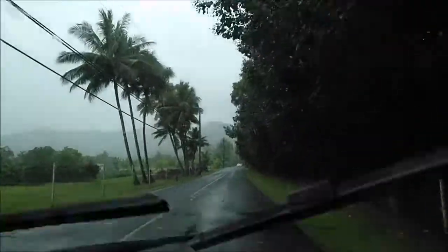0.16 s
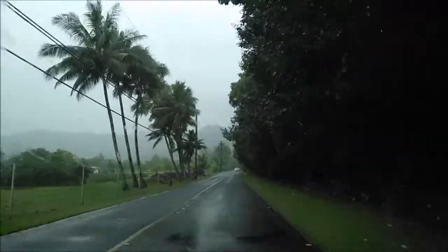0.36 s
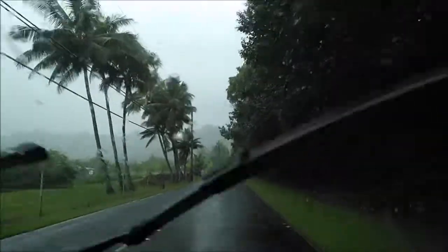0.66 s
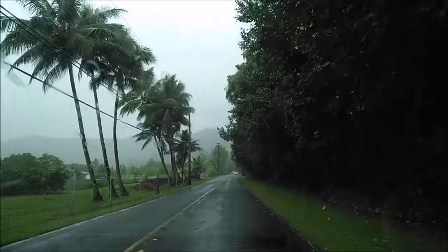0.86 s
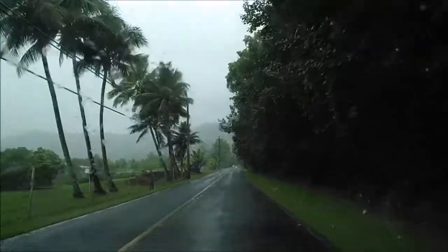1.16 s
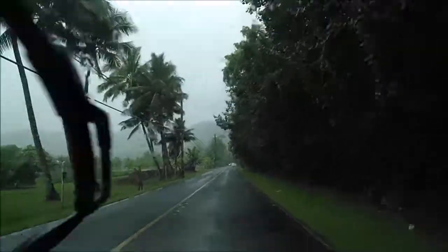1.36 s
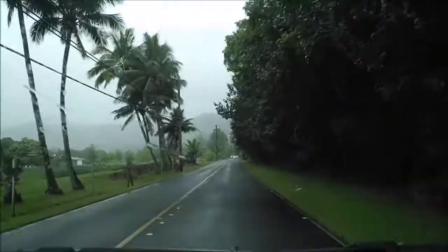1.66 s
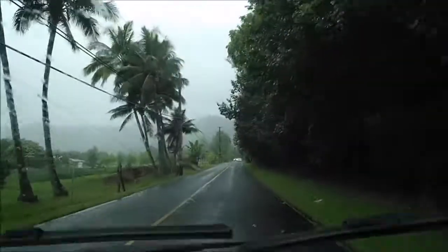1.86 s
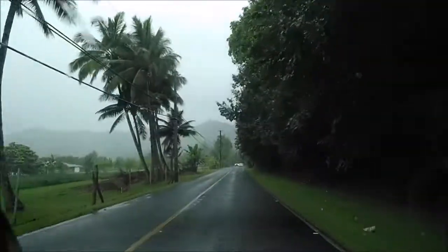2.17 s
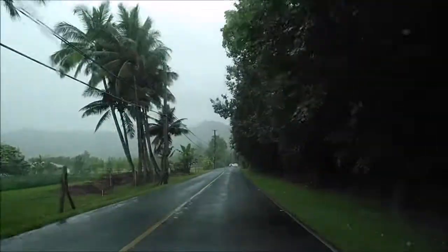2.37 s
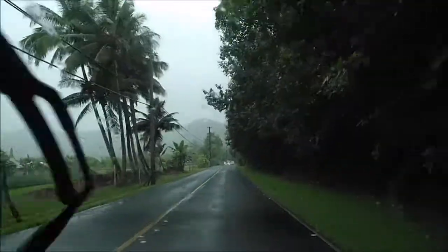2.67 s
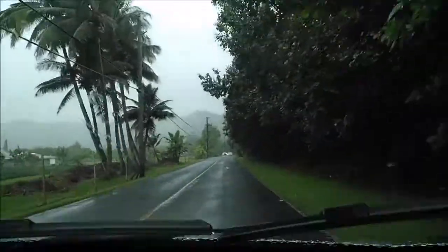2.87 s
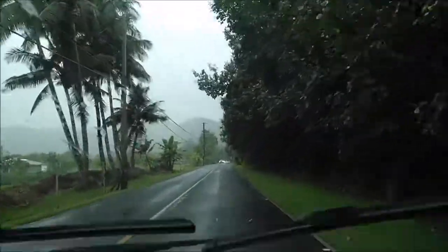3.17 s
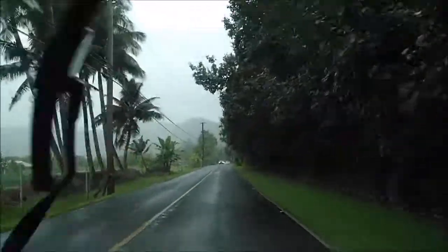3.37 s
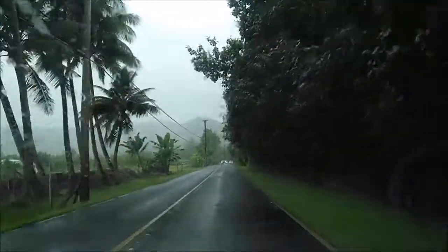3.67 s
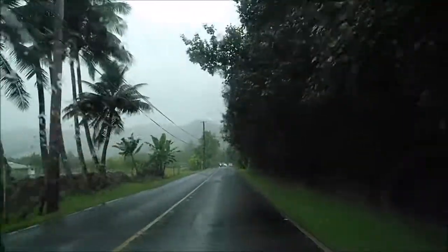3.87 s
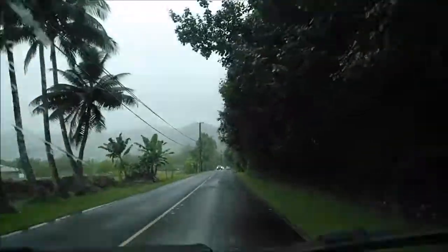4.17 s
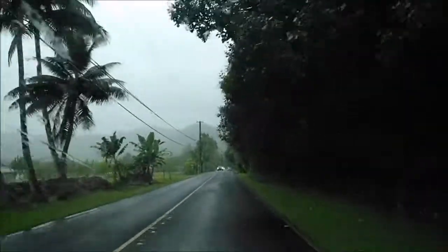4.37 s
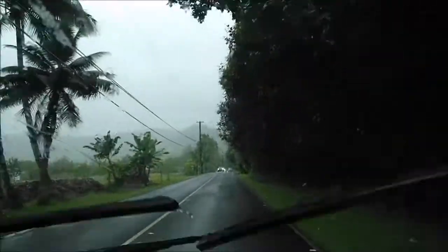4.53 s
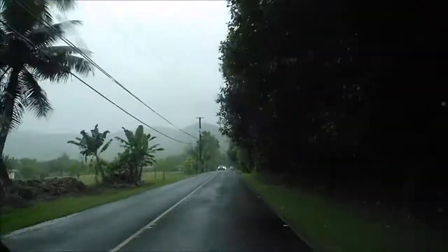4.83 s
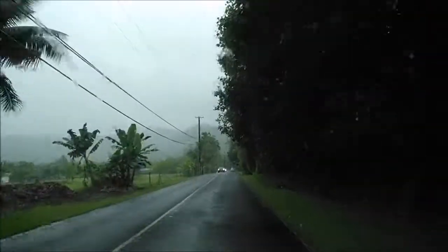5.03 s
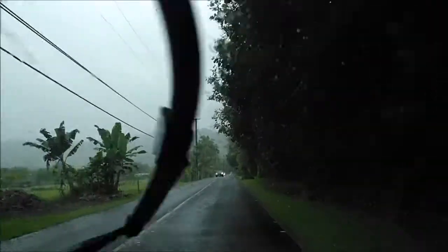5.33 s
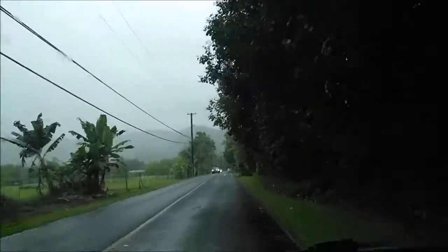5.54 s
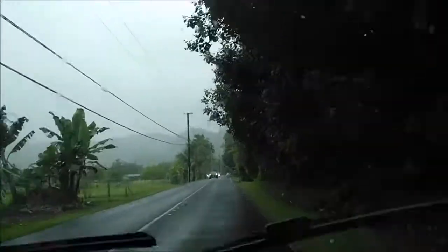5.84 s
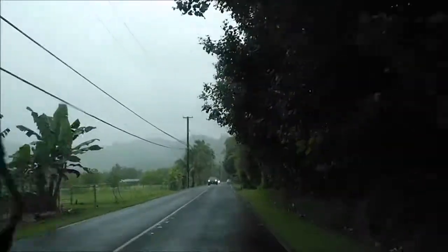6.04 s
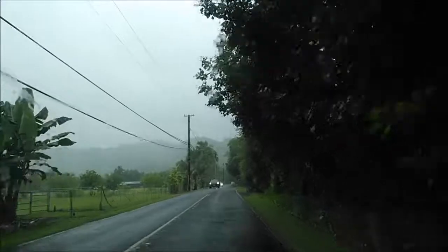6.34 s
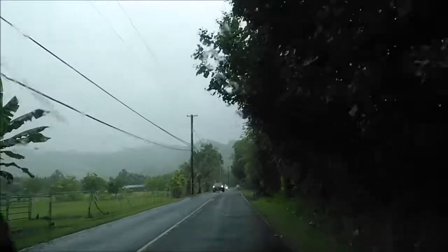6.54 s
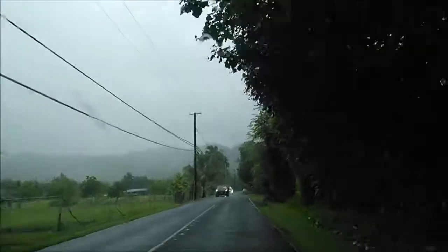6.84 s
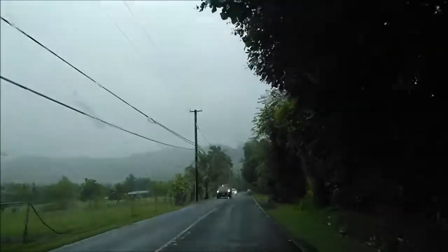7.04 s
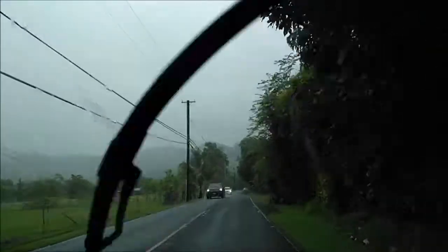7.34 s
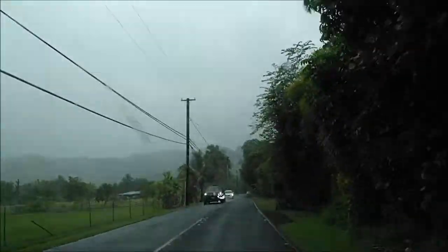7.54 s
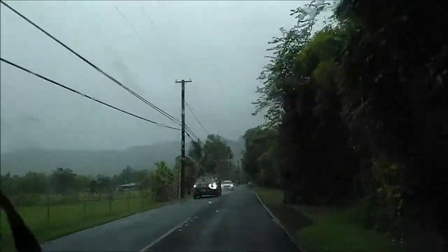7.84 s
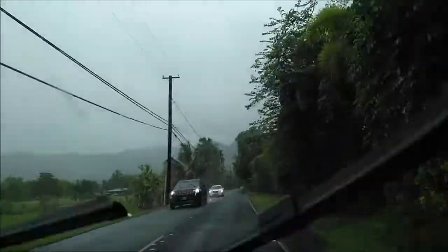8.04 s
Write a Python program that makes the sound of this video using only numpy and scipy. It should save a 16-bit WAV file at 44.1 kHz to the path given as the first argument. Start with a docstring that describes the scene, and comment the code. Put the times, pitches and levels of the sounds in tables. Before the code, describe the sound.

Inside a moving car on a wet road: low rumble, soft rain hiss, dull wiper thuds, and clustered hard drops smacking the windshield.

```python
"""Wet country road, car interior

Shaped noise gives body boom, cabin rumble, tread, tyre swish, rain hiss and low swells, mostly puddles.
Short low tones mark road bumps; wipers thud and slap at each turn; light drops tap the roof.
Drops from overhanging trees, faint to heavy, hit windshield and roof in bursts: noise blows with a brief ring,
flexing panel modes, falling droplets, one bubble tone and a short cabin reverberation."""
import sys
import numpy as np
from scipy import signal
from scipy.fft import rfft, irfft, next_fast_len
from scipy.io import wavfile
from scipy.ndimage import uniform_filter1d, map_coordinates

SR = 44100
rng = np.random.default_rng(int(sys.argv[2]) if len(sys.argv) > 2 else 0)


def file_out(sig):
    """Save sig as 16-bit WAV at sys.argv[1]."""
    # one column per channel
    cols = np.atleast_2d(sig).T
    # limit, then scale
    lim = np.clip(cols, -1, 1)
    pcm = np.round(lim * 32767).astype(np.int16)
    wavfile.write(sys.argv[1], SR, pcm)


N = 361664

# Spectra below are relative: each layer is scaled to rms 1, then set to its level.
# Road roughness: t/s, boom/dB, rumble/dB
ROAD_LEVELS = [(0, -50, -43.5), (0.66, -37.5, -40), (1.08, -46, -43), (1.4, -40, -42.5), (2.1, -49, -44.5),
               (2.75, -40.5, -40), (3.15, -47, -42.5), (4.25, -43.5, -41.5), (4.7, -39.5, -42.5),
               (5.1, -45.5, -41.5), (5.75, -42.5, -39.5), (6.2, -45.5, -44.5), (6.95, -45.5, -42),
               (7.2, -42, -41), (8.2, -46.5, -41.5)]
# Body boom spectrum: f/Hz, density/dB
BOOM_SPECTRUM = [(15, -45), (24, -29), (32, -19.5), (42, -17), (52, 1.5), (62, 2), (74, 0), (86, -5.5),
                 (105, -6.5), (170, -82.5)]
# Cabin air modes: f/Hz, width/Hz, level/dB
AIR_MODES = [(103.6, 17, -1.5), (136.8, 13.9, -1.5), (185.4, 29.3, -9.5), (241.6, 16.4, -10),
             (251.9, 8.6, -8.5)]
# Tyre tread spectrum: f/Hz, density/dB
TREAD_SPECTRUM = [(160, -34.5), (270, -1), (297, -11.5), (344, 0), (393, -4), (421, -8), (528, -5),
                  (588, -15), (635, -23), (750, -19), (980, -51), (1650, -120)]
# Narrow tread swish, level: t/s, level/dB
SING_LEVELS = [(0, -88), (1.2, -82), (2.1, -80.5), (2.8, -74), (3.3, -73.5), (3.7, -80), (4.05, -73.5),
               (4.6, -80.5), (6.5, -77.5), (8.2, -76)]
# Narrow tread swish, spectrum: f/Hz, density/dB
SING_SPECTRUM = [(950, -28), (1200, 0), (1290, 1.5), (1400, -14.5), (1700, -39.5)]
# Water on road and glass: t/s, hiss/dB
HISS_LEVELS = [(0, -61), (1.1, -62.5), (2.4, -64.5), (3.2, -64), (3.9, -62.5), (4.6, -64), (5.1, -61.5),
               (5.8, -64.5), (6.6, -62.5), (7.6, -63.5), (8.2, -62.5)]
# Hiss spectrum: f/Hz, density/dB
HISS_SPECTRUM = [(380, -26.5), (640, -1), (694, -13), (811, -13), (972, -7), (1170, -9.5), (1280, -7),
                 (1450, -12), (1870, -11.5), (2350, -10), (2580, -12.5), (3090, -15.5), (3710, -20),
                 (5330, -25), (7480, -38), (14500, -56.5)]
# Light roof drops, spectrum: f/Hz, density/dB
LIGHT_SPECTRUM = [(500, -22), (900, 3), (1300, -1), (2300, 0), (3400, -4.5), (6000, -21), (12000, -42.5)]
# Left-right correlation of the noise layers: f/Hz, correlation/1
STEREO_LIKENESS = [(60, 0.94), (130, 1), (290, 0.86), (630, 0.637), (1300, -0.058), (2400, -0.13),
                   (7000, 0.052)]
# Low noise swells: tyres in standing water, wiper turns at 1.79 s and 7.08 s, and at 5.53 s a drop's dull panel
# knock: # t/s, level/dB, half length/s
LOW_SWELLS = [(0.716, -52, 0.058), (0.9, -55, 0.04), (1.1, -57, 0.039), (1.789, -51, 0.05),
              (2.75, -56, 0.029), (4.147, -50, 0.058), (5.534, -47, 0.032), (5.77, -45.5, 0.061),
              (7.082, -48, 0.04), (7.569, -47.5, 0.24), (8.085, -53.5, 0.029)]
# Low swell spectrum: f/Hz, density/dB
CHURN_SPECTRUM = [(150, -29), (220, 7), (275, -5), (350, 1.5), (450, -9.5), (560, -12), (750, -25),
                  (1500, -77)]
# Low body tones: road bumps, and at 7.08 s the wiper's turn: t/s, peak/dB, f/Hz, half length/s
BODY_TONES = [(0.669, -25.5, 56.4, 0.012), (1.365, -28.5, 58, 0.016), (2.648, -27, 114, 0.0095),
              (4.169, -43.5, 267, 0.021), (4.427, -27.5, 111, 0.027), (4.806, -30, 64, 0.022),
              (6.004, -26, 110, 0.016), (7.081, -42.5, 278.6, 0.054), (8.07, -40, 200, 0.021)]
# Blade reversals: t/s, thud/dB, slap/dB
WIPER_EVENTS = [(0.456, -40, -68), (1.12, -38.5, -74), (1.777, -41.5, -59), (3.105, -48, -63),
                (4.419, -50, -61), (5.745, -43.5, -66), (7.068, -58, -68)]
# Wiper linkage thud: f/Hz, density/dB
THUD_SPECTRUM = [(90, -39), (160, 10), (215, 11.5), (270, -8.5), (330, -12), (480, -13.5), (800, -62)]
# Wiper rubber slap: f/Hz, density/dB
SLAP_SPECTRUM = [(200, -28.5), (500, 2), (950, 6), (1500, -14.5), (4000, -26.5), (8000, -53), (12000, -91)]
# Small drops shaken from the trees: t/s, level/dB, half length/s
SHOWER_EVENTS = [(.03, -56, 0.032), (.36, -66, 0.083), (6.13, -62, 0.079), (6.23, -66.5, 0.077),
                 (6.48, -60, 0.22), (7.42, -51.5, 0.05)]
# Shower spectrum: f/Hz, density/dB
SHOWER_SPECTRUM = [(400, -10), (900, -6), (1500, 1), (2400, 7.5), (3200, -4.5), (4200, -18), (5700, -21),
                   (8000, -40), (14000, -48)]
# Droplets falling back on the glass: f/Hz, density/dB
SPLASH_SPECTRUM = [(400, -28.5), (900, -10), (2300, -8), (4200, -11), (5100, -4.5), (5600, 11),
                   (6500, -0.5), (7700, -17), (9500, -15), (14000, -25)]
# Trapped air bubbles: t/s, level before rise and decay/dB, starting f/Hz, t60/s
BUBBLES = [(7.794, -38.5, 1460, 0.03)]
# Flexing panel: nominal f/Hz, level re knock/dB, t60/s
FLEX_MODES = [(157, 5, 0.036), (296, -1, 0.024), (477, 3, 0.047), (536, -13, 0.026)]
# Single drops, from faint ticks and small knocks to heavy smacks:
#   t/s, smack/dB, knock re smack/dB, snap re smack/dB, spray re snap/dB,
#   struck-spot resonance f/Hz, its height/dB, ring t60/s, crack re ring/1, left-right/dB
SINGLE_DROPS = [(0.1462, -44, -7, 4.5, -13, 1010, 10.5, 0.048, -0.5, 3),
                (0.188, -63, -3, 3, -16, 5800, 2, 0.065, 0.5, -3),
                (0.2133, -42.5, -11.5, -5.5, -13, 1970, 8, 0.04, 2, 1.5),
                (0.2463, -48, -20, -15, -14, 2200, 3, 0.032, 4, -5),
                (0.2818, -52.5, -5, -1, -9, 3780, 11.5, 0.081, 6, 0),
                (0.3447, -53.5, -1, -20, -15, 2220, 4.5, 0.1, -2, 0.5),
                (0.384, -61, 2, -14, -14, 1500, 3, 0.08, 0, -3),
                (0.494, -45, -20, 1, -10, 2900, 2, 0.037, -3, 0.5),
                (0.576, -51, -14, -14, -13, 2040, 4.5, 0.037, 6, -3.5),
                (1.0079, -47.5, 2, -0.5, -14, 820, 4, 0.056, 2, -1),
                (1.033, -55, -2.5, -9, -7, 1800, 7, 0.35, 3, -1),
                (1.5988, -71, 3, -2, -14, 5650, 7, 0.14, 5, 3),
                (2.527, -77, 8, 11, -10, 5640, 2.5, 0.07, 3.5, 2),
                (3.112, -68.5, 7, -17, -15, 1000, 7, 0.09, 2, 0),
                (3.349, -71.5, 3, -3.5, -19, 5600, 8, 0.13, 8, 4),
                (4.06, -69, 2, -16, -15, 1300, 10, 0.074, 2, 1.5),
                (4.426, -43.5, -11.5, -21, 1, 1780, -3, 0.074, 6, 1.5),
                (4.841, -54.5, -9, -17.5, -14, 2040, 7, 0.19, 5, 1),
                (4.9339, -46.5, -5.5, -32, -17, 740, 15, 0.13, -1, 0),
                (4.989, -44.5, -17.5, -19.5, -22, 2407, 1, 0.07, 5, 1),
                (5.1157, -33.5, -14.5, -15.5, -23, 2440, 4.5, 0.041, 3, -0.5),
                (5.1708, -36, -10.5, -20.5, -13, 1625, 3.5, 0.042, 3.5, -3),
                (5.4291, -39, -12.5, -5, -14, 2100, 5, 0.051, 3, 5.5),
                (5.4448, -49.5, -8, 0.5, -13, 2700, 0, 0.097, 1, 2),
                (5.4612, -47.5, -12, -6, -5, 2100, 7, 0.25, 6, 0),
                (5.494, -41, -2.5, -13, -7, 1700, 5.5, 0.13, 2, 0),
                (5.512, -36, -32, -4.5, -15, 3400, -1, 0.044, 1, 2),
                (5.5416, -41, 2, -9, -14, 640, 4, 0.11, 3, -1),
                (5.5535, -42.5, -5, -12, -5, 2250, 9, 0.14, 4, -1),
                (5.5589, -42, -14, -7, -11, 2420, 6, 0.037, 0, -1),
                (5.574, -53, -1, -14, -14, 2700, -7, 0.055, 4, -5),
                (5.671, -64.5, 2, -18, -14, 1050, 6, 0.1, 3, 0),
                (5.752, -73, 8, -14, -17, 1000, 6, 0.09, 1, 0),
                (5.8512, -45, -14, -4, -15.5, 2360, 3, 0.11, 4, 1),
                (5.912, -42.5, -13.5, -11, -12, 2400, 3, 0.13, 10, 0),
                (5.9367, -46.5, -9, -6, -21, 1980, 10, 0.13, 5, 1),
                (5.9536, -32.5, -12, -38, -13, 1500, 9, 0.088, 1.5, -5),
                (6.0212, -33, -8, -11.5, -28, 960, 7, 0.027, 1.5, -2),
                (6.352, -54, -1, -4, -8, 2100, 8, 0.43, 9, 3.5),
                (6.39, -45.5, -11, -6, -14, 2100, 2, 0.065, 9, 1),
                (6.452, -41, -26, -8.5, -11.5, 3700, 7, 0.11, 5, -1.5),
                (6.4755, -38.5, -24, -24, -14, 1500, 11.5, 0.08, 1, -5),
                (6.496, -39.5, -24, -11, -13, 2400, 8, 0.039, 6, 3),
                (6.511, -49, -14, -4, -13, 2600, 1, 0.04, 1, 2),
                (6.516, -37, -21, -5, -33, 2450, 4, 0.032, 1.5, 3.5),
                (6.5678, -47, -18, -6, -16, 2350, 1, 0.04, 3, 2),
                (6.577, -40, -20, -26, -13, 1620, 9, 0.14, -1, -3),
                (6.584, -64, -6, 11, -14, 5800, 5, 0.029, 3, 4),
                (6.594, -40, -14.5, -1.5, -12.5, 2000, 1.5, 0.063, 3, 2),
                (7.0799, -60.5, 2, 5, -11, 2320, 12, 0.065, 7, 3.5),
                (7.188, -58.5, -9, -6, -12, 6000, 3, 0.19, 2, 11),
                (7.199, -34.5, -12.5, -24, -7, 1480, 5, 0.04, 2, 3.5),
                (7.222, -37, -10, -13, -14, 2920, 5.5, 0.061, 1.5, -1),
                (7.345, -77, -10, 4, 1, 5500, 2, 0.014, 2, 6),
                (7.3611, -40, -21, -4.5, -12, 2870, 5.5, 0.059, 6, 3.5),
                (7.391, -57, 0, 9.5, -11, 2740, 4, 0.22, 7, 8),
                (7.412, -36, -14.5, -9, -14, 2400, 2.5, 0.089, 1, -2.5),
                (7.462, -52.5, -8, -9, -9, 3500, -2, 0.071, 2, 3),
                (7.4956, -35, -21, 0, -11.5, 3000, 2, 0.044, -1, 3),
                (7.765, -63.5, 3, 2, -3.5, 3300, 4, 0.15, 8, 1)]
# Edges of the knock, smack, snap and spray bands: f/Hz
BAND_EDGES_HZ = [500, 1400, 3400, 7000, 14000]
# Windshield colour, added to every drop: f/Hz, gain/dB
GLASS_GAIN = [(400, -5.5), (630, -4), (780, 2), (1000, 1.5), (1250, 0.5), (1500, 1), (1900, -1.5),
              (2400, 0.5), (3200, 1.5), (4300, -1.5), (5500, 1), (7500, -3.5), (10000, -1), (14000, -9)]
# Faint stray drop: knock/dB, snap/dB, spray/dB, centre spot f/Hz, spot height/dB,
#   t60/s (negative: it swells until cut off), crack/1, left-right/dB
STRAY_SETTINGS = (-2, 10.5, -15.5, 5600, 0.5, -0.5, 0, 1.5)
# Cabin reverberation: f/Hz, t60/s
CABIN_T60 = [(400, 0.25), (2000, 0.14), (6000, 0.18), (12000, 0.18)]

TREAD_DB, TREAD_DB_PER_RUMBLE_DB = -56.5, 0.22
TREAD_SURGE_DB, SURGE_PER_S = 1, 8
JOLT_DB, JOLT_PER_S = 1.5, 11
LIGHT_PER_S, LIGHT_DB, LIGHT_T60_S = 20, -79.5, 0.034
SHOWER_PER_S, SMALL_SCATTER_DB = 1400, 0.5
SPLASH_RE_SNAP_DB, SPLASH_RISE_S, SPLASH_T60_S = -15, 0.013, 0.33
STRAY_PER_S, STRAY_DB = 1.6, -81.5
CABIN_SEND_DB = -13.5
TOP_HZ = 14500


def amp(db):
    """Decibels to gain."""
    return 10 ** (np.asarray(db) / 20)


def unit(x):
    """Scale to rms 1."""
    return x / np.sqrt(np.mean(x ** 2) + 1e-20)


def along(points, hz):
    """(Hz, value) points, interpolated on a log frequency axis."""
    f, v = np.transpose(points)
    return np.interp(np.log(hz + 1), np.log(f + 1), v)


def shape(points):
    """Gain response from (Hz, dB) points."""
    return lambda hz: amp(along(points, hz))


def curves(rows):
    """One value per sample for each column after the time."""
    s, *cols = np.transpose(rows)
    return [np.interp(np.arange(N) / SR, s, c) for c in cols]


def swells(rows):
    """Sum of Gaussian gain swells from (s, dB, half length s)."""
    t = np.arange(N) / SR
    return sum(amp(db) * np.exp(-((t - s) / half_s) ** 2) for s, db, half_s in rows)


def wobble(per_s):
    """Smooth random curve with per_s knots a second."""
    knots = rng.standard_normal(int(N * per_s / SR) + 4)
    return map_coordinates(knots, [np.arange(N) * per_s / SR])


def noise():
    """Two unrelated white noises."""
    return rng.standard_normal((2, N))


def droplets(per_s):
    """Tiny impacts of uneven strength and random sign at random moments."""
    hits = rng.random((2, N)) < per_s / SR
    return hits * amp(SMALL_SCATTER_DB * noise()) * np.sign(noise())


def filtered(x, response):
    """Apply a frequency response, zero-padded against wrap-around."""
    m = next_fast_len(N + SR // 2)
    return irfft(rfft(x, m) * response(np.fft.rfftfreq(m, 1 / SR)), m)[..., :N]


def rush(response, source):
    """Colour two unrelated signals into a stereo pair of rms 1 with the tabled correlation."""
    def mid_side(hz):
        turn = np.arccos(np.clip(along(STEREO_LIKENESS, hz), -1, 1)) / 2
        return response(hz) * np.array([np.cos(turn), np.sin(turn)])
    mid, side = filtered(source, mid_side)
    return unit(np.array([mid + side, mid - side]))


def patchy(x, depth_db, size=22):
    """Let each spectral region swell and sink on its own; size in STFT frames."""
    z = signal.stft(x, nperseg=512)[2]
    field = uniform_filter1d(rng.standard_normal(z.shape[1:]), size=6, axis=0)
    field = uniform_filter1d(field, size=size, axis=1)
    return signal.istft(z * amp(depth_db * unit(field)), nperseg=512)[1][:, :N]


def causal(gain):
    """Minimum-phase response with this gain, by folding the cepstrum."""
    c = irfft(np.log(np.maximum(gain, 1e-6)))
    c[1:len(c) // 2] *= 2
    c[len(c) // 2 + 1:] = 0
    return np.exp(rfft(c))


def burst(blow, order=121):
    """Spectra of two noises under an envelope, evened out to be broadband."""
    z = rfft(blow * rng.standard_normal((2, len(blow))))
    power = uniform_filter1d(uniform_filter1d(np.abs(z) ** 2, order), order)
    return z * np.sqrt(np.sum(blow ** 2) / np.abs(power))


def cabin_modes(f, low_hz=85, high_hz=285):
    """Cabin air resonances, driven over a limited band by the suspension."""
    modes = 0
    for k, (mode_hz, width_hz, db) in enumerate(AIR_MODES):
        damping = 1j * f * width_hz
        modes = modes + (-1) ** k * amp(db) * damping / (mode_hz ** 2 - f ** 2 + damping)
    return modes / np.sqrt((1 + (low_hz / (f + 1)) ** 12) * (1 + (f / high_hz) ** 16))


def road():
    """Rough asphalt shakes body, cabin air and tread: three shaped noises."""
    boom_db, rumble_db = curves(ROAD_LEVELS)
    boom = amp(boom_db + JOLT_DB * wobble(JOLT_PER_S)) * rush(shape(BOOM_SPECTRUM), noise())
    rumble = amp(rumble_db) * rush(cabin_modes, noise())
    tread_db = TREAD_DB + TREAD_DB_PER_RUMBLE_DB * (rumble_db - rumble_db.mean())
    tread_db = tread_db + TREAD_SURGE_DB * wobble(SURGE_PER_S)
    tread = amp(tread_db) * rush(shape(TREAD_SPECTRUM), noise())
    return boom * amp([[-.7], [.7]]) + rumble + tread * amp([[-.4], [.4]])


def tyre_sing():
    """Tread on wet asphalt: a narrow noise band that comes and goes."""
    level_db, = curves(SING_LEVELS)
    return amp(level_db) * rush(shape(SING_SPECTRUM), noise())


def drizzle(per_s=200, scatter_db=5, patter=0.55, patchy_db=1.25, tick_t60_s=0.11):
    """Tyre spray hisses as noise; tiny drops patter on the glass as decaying noise ticks."""
    hiss_db, = curves(HISS_LEVELS)
    hits = (rng.random(N) < per_s / SR) * amp(scatter_db * rng.uniform(0.5, 9.8, N))
    t = np.arange(SR // 20) / SR
    ring = rng.standard_normal((2, len(t))) * amp(-60 * t / tick_t60_s)
    ticks = unit(signal.fftconvolve(hits[None], ring, axes=1)[:, :N])
    return amp(hiss_db) * rush(shape(HISS_SPECTRUM), patchy(noise() + patter * ticks, patchy_db))


def light_drops():
    """Light drops on the roof: separate, decaying noise taps."""
    hits = (rng.random(N) < LIGHT_PER_S / SR) * rng.uniform(0.22, 1, N)
    t = np.arange(SR // 10) / SR
    power = signal.fftconvolve(hits, amp(-60 * t / LIGHT_T60_S) ** 2)[:N]
    return amp(LIGHT_DB) * rush(shape(LIGHT_SPECTRUM), np.sqrt(np.abs(power)) * noise())


def low_swells(pan_db=-3, slosh_db=3.5):
    """Tyres in standing water, two wiper turns and one dull panel knock: swelling noise with a patchy spectrum."""
    churn = rush(shape(CHURN_SPECTRUM), patchy(noise(), slosh_db, size=9))
    return swells(LOW_SWELLS) * churn * amp([[pan_db / 2], [-pan_db / 2]])


def body_tones():
    """Road bumps, and one wiper turn: each a tone under a Gaussian swell."""
    t = np.arange(N) / SR
    return sum(amp(db) * np.exp(-((t - s) / half_s) ** 2) * np.cos(2 * np.pi * hz * (t - s))
               for s, db, hz, half_s in BODY_TONES)


def wipers(rise_s=0.0056, t60_s=0.2):
    """Linkage thuds through the dashboard, rubber slaps the glass: two noises, one envelope."""
    thud, slap = np.zeros((2, N))
    for s, thud_db, slap_db in WIPER_EVENTS:
        t = np.maximum(np.arange(N) / SR - s, 0)
        flip = (1 - np.exp(-t / rise_s)) * amp(-60 * t / t60_s)
        flip /= flip.max()
        thud += amp(thud_db) * flip
        slap += amp(slap_db) * flip
    return thud * rush(shape(THUD_SPECTRUM), noise()) + slap * rush(shape(SLAP_SPECTRUM), noise())


def showers():
    """Fine drops shaken from the trees merge into a soft swish."""
    return swells(SHOWER_EVENTS) * rush(shape(SHOWER_SPECTRUM), droplets(SHOWER_PER_S))


def splash(per_s=900, ragged_db=1.5, clumps_per_s=110, snap_cap_db=-43):
    """Droplets thrown off each tabled drop crackle back on the glass; the snap that drives them is capped."""
    t = np.arange(SR // 3) / SR
    fall = (1 - np.exp(-t / SPLASH_RISE_S)) * amp(-60 * t / SPLASH_T60_S)
    power = np.zeros(N + SR)
    for s, db, _, snap_db, *_ in SINGLE_DROPS:
        level_db = min(db + snap_db, snap_cap_db) + SPLASH_RE_SNAP_DB
        power[round(s * SR):][:len(t)] += (amp(level_db) * fall) ** 2
    crackle = droplets(per_s) * amp(ragged_db * wobble(clumps_per_s))
    return np.sqrt(power[:N]) * rush(shape(SPLASH_SPECTRUM), crackle)


def plips(rise_s=0.0026, glide_per_s=1.5):
    """A trapped bubble rings as a short tone of slightly rising pitch."""
    out = np.zeros(N + SR)
    t = np.arange(SR // 8) / SR
    for s, db, hz, t60_s in BUBBLES:
        tone = np.sin(2 * np.pi * hz * (t + glide_per_s * t ** 2 / 2))
        out[round(s * SR):][:len(t)] += amp(db - 60 * t / t60_s) * (1 - np.exp(-t / rise_s)) * tone
    return out[:N]


def panel_flex(scatter_db=2):
    """Each drop in the table bends the panel, which swings back in its lowest, randomly detuned modes."""
    out = np.zeros(N + SR)
    t = np.arange(SR // 6) / SR
    for s, db, knock_db, *_ in SINGLE_DROPS:
        swing = 0
        for hz, level_db, t60_s in FLEX_MODES:
            gain = amp(level_db + scatter_db * rng.standard_normal() - 60 * t / t60_s)
            swing = swing + gain * np.sin(2 * np.pi * hz * rng.uniform(0.773, 1.194) * t)
        out[round(s * SR):][:len(t)] += amp(db + knock_db) * swing
    return out[:N]


def stray_drops(count=12):
    """Rows of faint drops at random moments and spots, one in each 1/STRAY_PER_S slot."""
    when, strength, spot = rng.random((count, 3)).T
    times_s = (np.arange(count) + when) / STRAY_PER_S
    knock_db, snap_db, spray_db, centre_hz, *rest = STRAY_SETTINGS
    levels_db = STRAY_DB + SMALL_SCATTER_DB * (2 * strength - 1)
    spots_hz = centre_hz * 2 ** ((spot - .5) / 2)
    return [(s, db, knock_db, snap_db, spray_db, hz, *rest)
            for s, db, hz in zip(times_s, levels_db, spots_hz) if s < N / SR]


def drop_colour(levels_db, spot_hz, spot_db, hz, low_hz=480, spray_hz=9500, spot_octaves=0.13):
    """Gain of a drop: four band levels, glass colour and struck-spot resonance."""
    edges = np.array(BAND_EDGES_HZ)
    density_db = levels_db - 10 * np.log10(np.diff(edges) / (SR / 2))
    centres_hz = np.sqrt(edges[1:] * edges[:-1])
    slope_db = along(list(zip(centres_hz, density_db)), hz)
    peak_db = spot_db / (1 + (np.log2((hz + 1) / spot_hz) / spot_octaves) ** 2)
    roll_off = (1 + (low_hz / (hz + 1)) ** 4) * (1 + (hz / spray_hz) ** 4)
    return amp(slope_db + peak_db + along(GLASS_GAIN, hz)) / np.sqrt(roll_off)


def drops(rows, crack_s=0.00067, spread_s=0.0013, ripple_db=1.5, clump_db=2, size=8192):
    """A drop flattens and cracks; clumped noise and spectral ripple give its breakup and close panel modes."""
    smack_s, ripple_hz, clumps_per_s = .015, 180, 1200
    out = np.zeros((2, N + size))
    t, hz = np.arange(size) / SR, np.fft.rfftfreq(size, 1 / SR)
    likeness = along([(500, 0.85), (1500, 0.04), (3000, 0.036)], hz)
    turn = np.arccos(np.clip(likeness, -1, 1)) / 2
    for s, db, knock_db, snap_db, spray_db, spot_hz, spot_db, t60_s, crack, pan_db in rows:
        blow = (1 - np.exp(-t / spread_s)) * amp(-60 * t / t60_s) * (1 + crack * np.exp(-t / crack_s))
        clumps = map_coordinates(rng.standard_normal(size // 32), [t * clumps_per_s], mode="mirror")
        blow *= amp(clump_db * clumps)
        blow *= np.sqrt(smack_s * SR / np.sum(blow ** 2))  # energy of rms 1 held for smack_s
        ripple = map_coordinates(rng.standard_normal(size // 32), [hz / ripple_hz], mode="mirror")
        levels_db = db + np.array([knock_db, 0, snap_db, snap_db + spray_db])
        colour = drop_colour(levels_db, spot_hz, spot_db, hz) * amp(ripple_db * ripple)
        mid, side = irfft(burst(blow) * causal(colour) * [np.cos(turn), np.sin(turn)])
        smack = np.array([mid + side, mid - side]) * amp([[pan_db / 2], [-pan_db / 2]])
        out[:, round(s * SR):][:, :size] += smack
    return out[:, :N]


def cabin(x, delay_s=0.0079, build_s=0.00067):
    """Short reverberation of seats and windows, a decaying noise tail; the windows keep the treble alive."""
    hz, t, z = signal.stft(rng.standard_normal((2, SR // 2)), SR, nperseg=256)
    fade = amp(-60 * t / along(CABIN_T60, hz)[:, None]) * (1 - np.exp(-t / build_s))
    tail = signal.istft(z * fade, SR, nperseg=256)[1]
    tail = np.pad(tail / np.linalg.norm(tail[0]), ((0, 0), (round(delay_s * SR), 0)))
    echo = signal.fftconvolve(x, tail, axes=1)[:, :N]
    return filtered(echo, shape([(800, 2), (2400, 2.0), (4000, -2.0), (6000, 5.5), (8000, 3.5), (13000, 5.0)]))


def scene():
    """Driving noise, wipers and rain under bursts of single drops."""
    driving = road() + tyre_sing() + drizzle() + light_drops() + low_swells() + body_tones() + wipers()
    small_water = showers() + splash()
    smacks = plips() + drops(SINGLE_DROPS + stray_drops())
    return driving + small_water + panel_flex() + smacks + amp(CABIN_SEND_DB) * cabin(smacks)


def record(dry):
    """Steep low-pass at TOP_HZ."""
    return filtered(dry, lambda hz: 1 / np.sqrt(1 + (hz / TOP_HZ) ** 120))


dry = scene()
out = record(dry)
file_out(out)
```